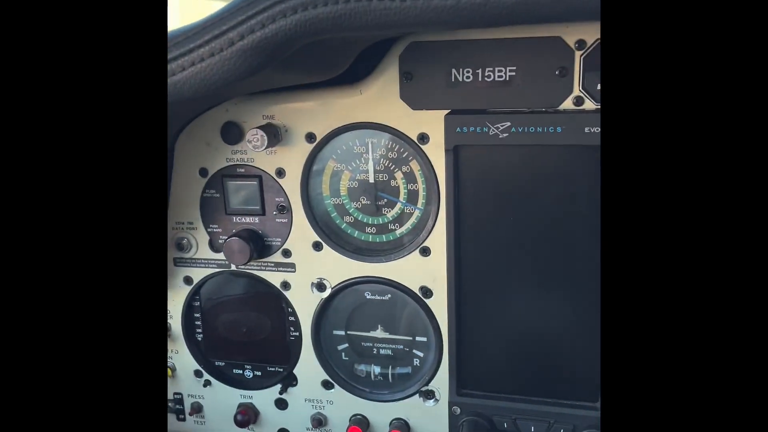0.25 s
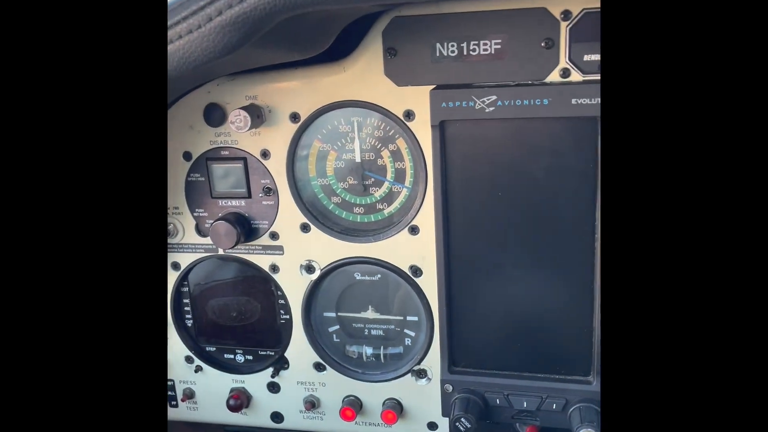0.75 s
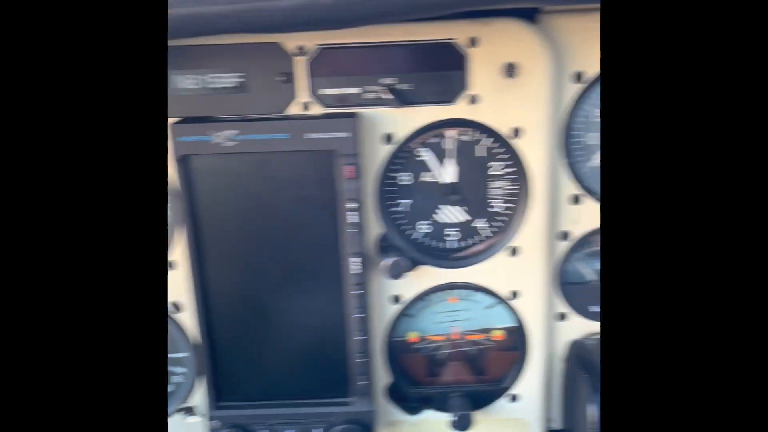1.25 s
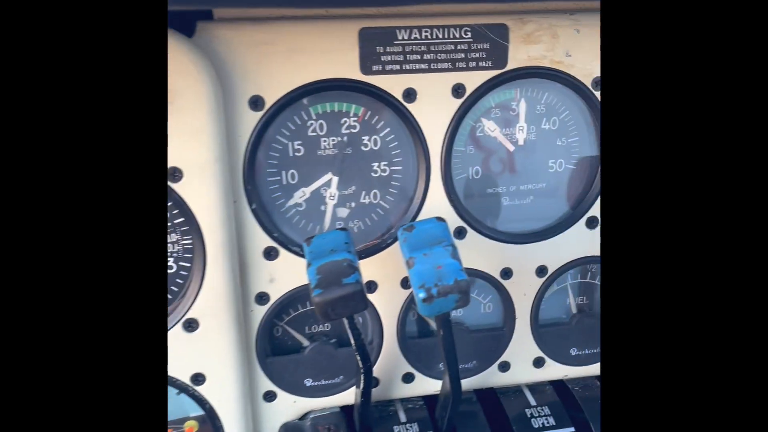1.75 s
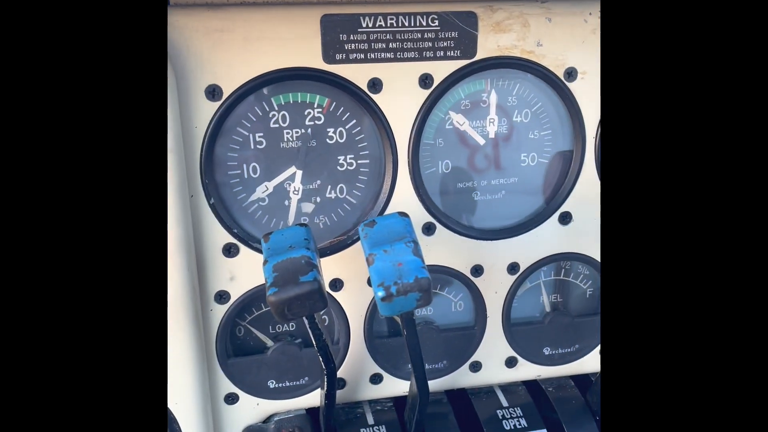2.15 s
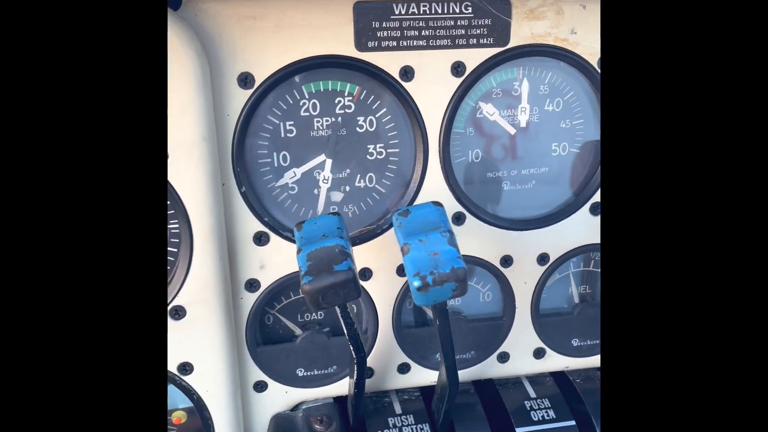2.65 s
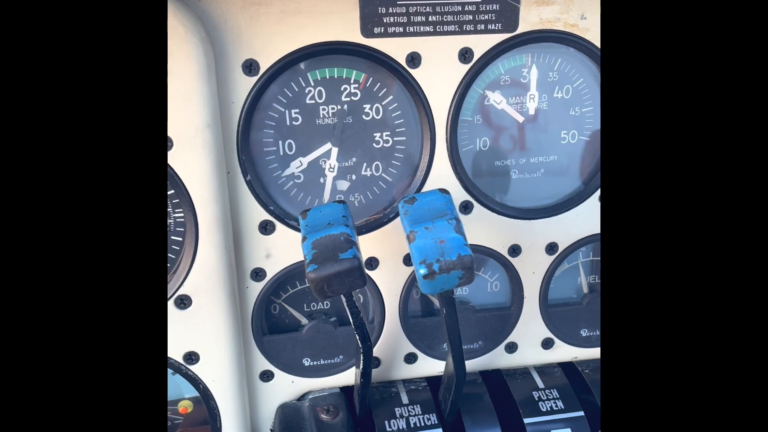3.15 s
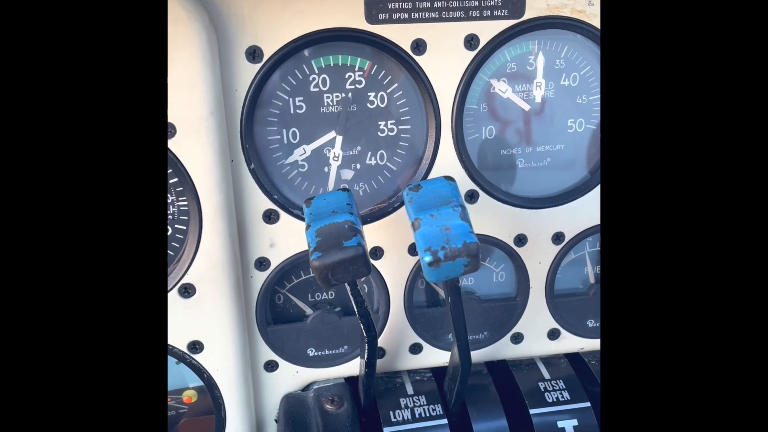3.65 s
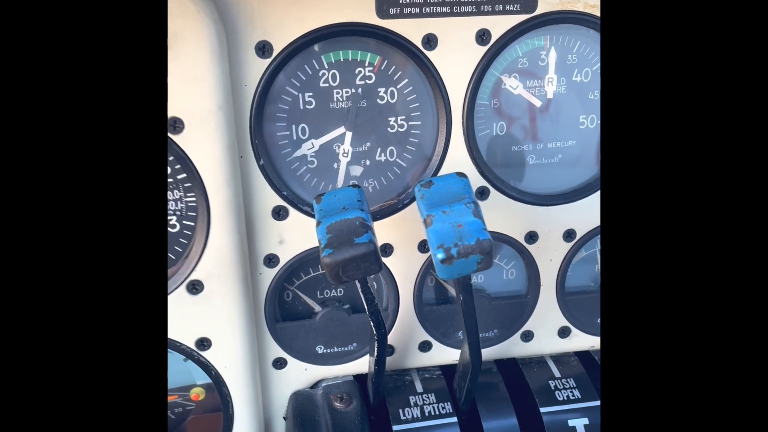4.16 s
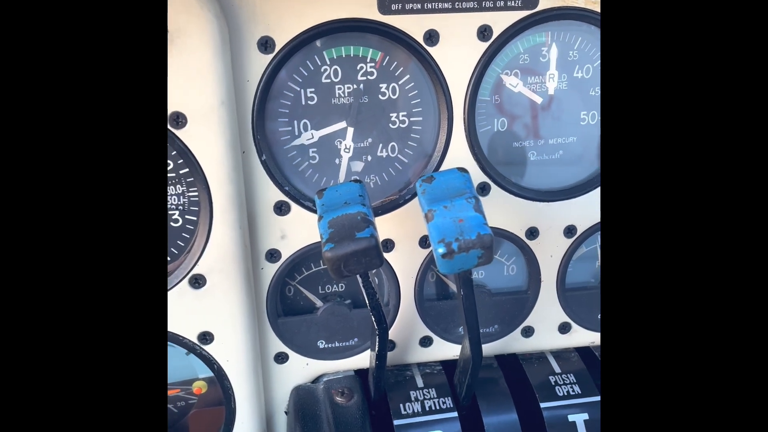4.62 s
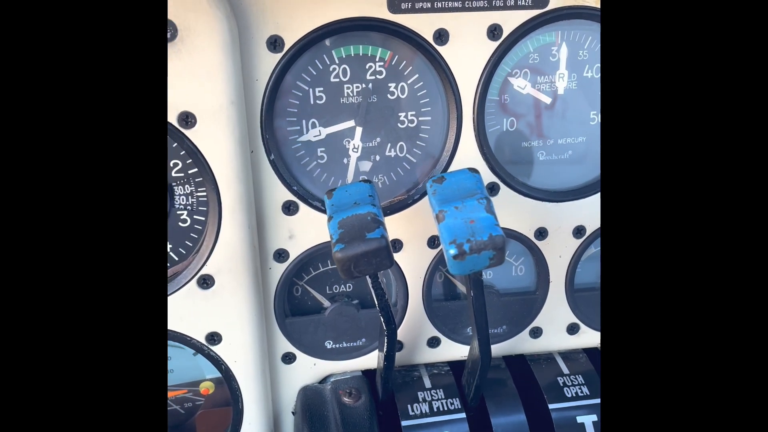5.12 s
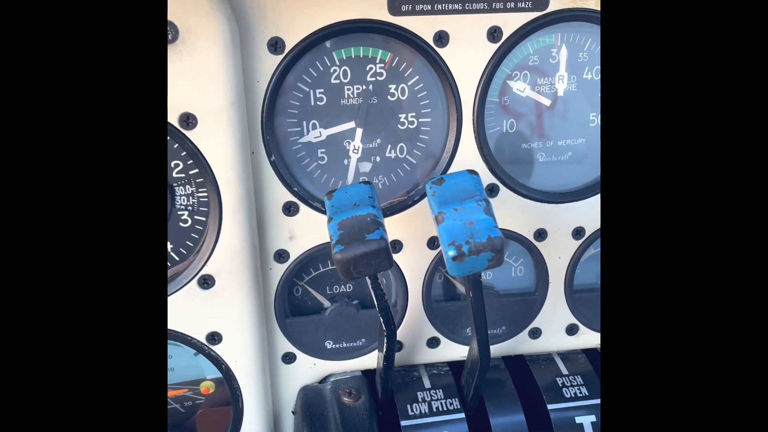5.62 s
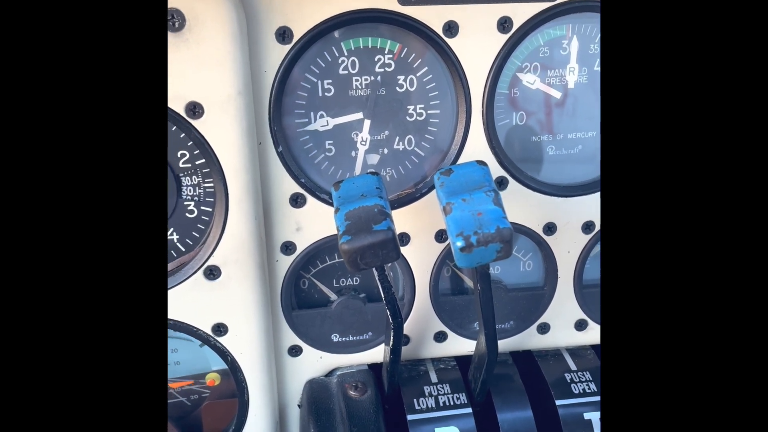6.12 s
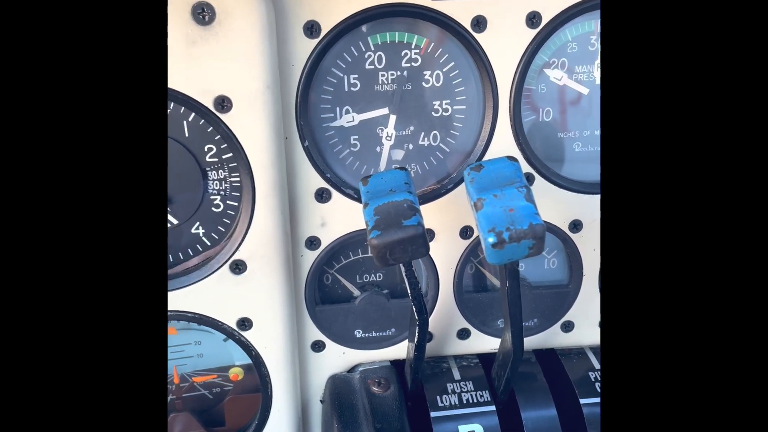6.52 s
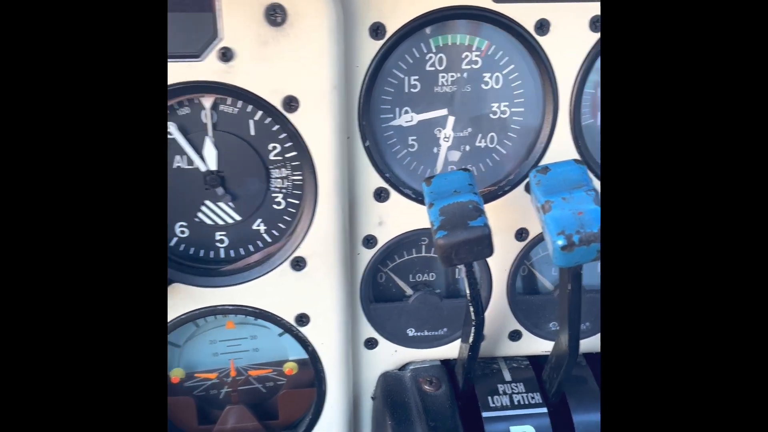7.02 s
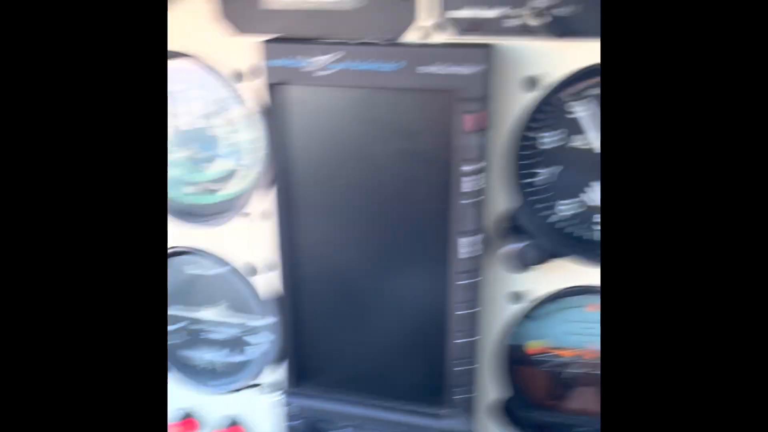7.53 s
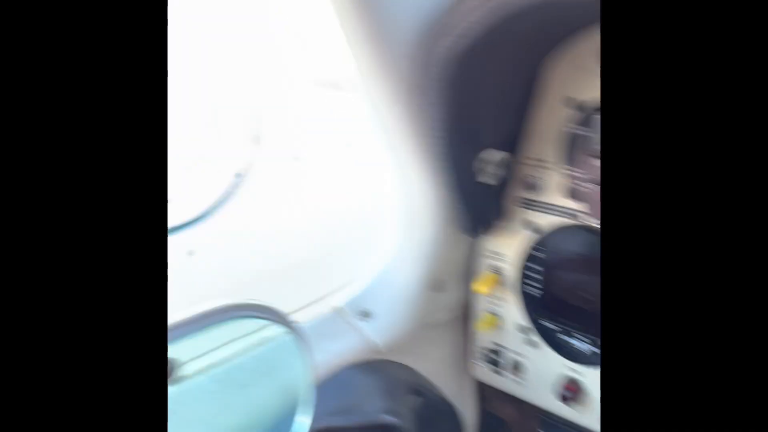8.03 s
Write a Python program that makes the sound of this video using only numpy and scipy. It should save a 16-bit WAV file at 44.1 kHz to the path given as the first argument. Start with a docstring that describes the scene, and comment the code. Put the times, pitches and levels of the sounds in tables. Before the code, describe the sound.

A piston aircraft engine idles lumpily inside a closed cockpit, its deep boom and metallic clatter quickening as throttle rises, ending with louder airy roar.

```python
"""A lumpy engine boom in a closed cockpit, over air roar and gear clatter, rises as the throttle is eased up.
Boom: sines at firing and propeller orders of a geared six-cylinder aircraft engine, weighted by the cabin.
Roar: coloured noise on skin, window and floor, swelling with each firing.
Clatter: noise bursts ringing in the gear case, one per firing, plus valve ticks and hard knocks.
Near the end the hand-held two-port microphone swings to the side window, where the roar is louder."""
import sys
import numpy as np
from scipy import signal
from scipy.fft import rfft, irfft
from scipy.io import wavfile
from scipy.ndimage import uniform_filter1d

SR = 44100
rng = np.random.default_rng(int(sys.argv[2]) if len(sys.argv) > 2 else 0)


def to_wav(s):
    """Save 16-bit WAV."""
    ch = np.atleast_2d(s).T  # columns
    pcm = np.round(np.clip(ch, -1, 1) * 32767)  # PCM
    wavfile.write(sys.argv[1], SR, pcm.astype(np.int16))


N = 365148
SLOTS = 12   # firings per pattern: engine and geared propeller come back into step


def from_db(db):
    """Decibels to amplitude gain."""
    return 10 ** (np.asarray(db) / 20)


def summed_db(a_db, b_db):
    """Level of two unrelated sounds together: powers add."""
    return 10 * np.log10(from_db(2 * a_db) + from_db(2 * b_db))


def rms_one(x):
    """Scale to rms 1."""
    return x / np.sqrt(np.mean(x ** 2) + 1e-20)


def in_time(rows):
    """Columns of a time table, interpolated to one value per sample."""
    time_s, *columns = np.transpose(rows)
    return [np.interp(np.arange(N) / SR, time_s, column) for column in columns]


def at_hz(points, hz, axis=1):
    """One column of a frequency table, interpolated over log frequency."""
    points = np.array(points)
    return np.interp(np.log(np.maximum(hz, 1)), np.log(points[:, 0]), points[:, axis])


def drift(rate_hz):
    """Slow random curve of rms 1: noise through two equal poles at rate_hz."""
    step = 40
    r = np.exp(-2 * np.pi * rate_hz * step / SR)
    noise = rng.standard_normal(N // step + 2002)
    slow = signal.lfilter([1], [1, -2 * r, r * r], noise)[2000:]   # drop the settling
    return np.interp(np.arange(N) / step, np.arange(len(slow)), rms_one(slow - slow.mean()))


# engine and propeller orders: (multiple of pattern rate [1], relative level before cabin [dB])
ORDER_LEVELS = [(12, -12), (18, -20), (24, -19), (30, -29), (36, -28.5), (10, -20), (13, -25), (14, -32),
                (15, -31), (16, -27), (17, -33), (19, -30), (20, -30), (21, -34), (22, -31), (23, -38),
                (25, -31), (26, -33), (27, -38), (28, -37), (29, -34), (31, -35), (35, -44), (37, -46),
                (42, -41), (48, -39), (60, -39), (66, -50), (72, -49), (78, -57), (84, -44), (96, -47.5),
                (108, -49), (120, -48.5), (132, -53)]
# cabin response to low tones: (frequency [Hz], gain [dB], phase [turns])
CABIN = [(20, -37, 1.44), (32, -27, 1.42), (40, -12, 1.71), (46, -5, 2.11), (51, 5, 2.04), (56, 12, 2.14),
         (61, 9, 2.3), (66, 9, 2.46), (71, 4, 2.68), (77, -1, 3.4), (84, 4, 3.72), (92, 6, 4.23),
         (103, 5, 4.8), (118, 5, 4.81), (140, -3, 5.93), (170, 0, 7.01), (230, 8, 8.09), (300, 12, 9.17),
         (460, 11, 10.25)]
# crank speed wobble: phase [turns] at 0 to 3 times the pattern rate
CRANK_WOBBLE = (0, .004, .638, -.043)
# orders that stand out or sink at a slow, lumpy idle: {order [1]: added level [dB]}
LUMPY_ORDERS = {13: 5, 15: -8, 16: 4, 17: 7, 18: -9, 19: 9, 21: 4, 23: 8, 30: -4, 35: 5, 37: 14}
LUMPY_BELOW_PER_S, LUMPY_FADE_PER_S = 37, 3   # firing rate of onset; further drop to full effect
PULSE_LEAD_TURNS = .103   # exhaust pulse ahead of gear slap, in pattern turns
SMEAR_TURNS = .082   # times overtone number squared


def boom(firings, per_s):
    """One sine per order: multiples of six are overtones of a pulse smeared in time by pipes and cabin;
    the orders around them are phased as its vibrato from the crank's uneven speed."""
    step = 20   # computed at every twentieth sample
    turns, rate_hz = firings[::step] / SLOTS, per_s[::step] / SLOTS
    lumpy = np.clip((LUMPY_BELOW_PER_S - per_s[::step]) / LUMPY_FADE_PER_S, 0, 1)
    out = 0
    for order, order_db in ORDER_LEVELS:
        off = (order + 2) % 6 - 2   # steps from the multiple of six, -2 to 3
        overtone = (order - off) / 6
        phase = SMEAR_TURNS * overtone ** 2
        phase = phase + np.sign(off) * CRANK_WOBBLE[abs(off)] + .684 * (off < 0)
        phase = phase + PULSE_LEAD_TURNS * order + at_hz(CABIN, order * rate_hz, axis=2)
        if order > 40:   # high overtones flicker, and sharpen with throttle
            waver_db = 3 * drift(2.5)[::step] - 1
            load_db = 4.0 * (rate_hz - 3.7)
        else:
            waver_db = (1.5 if off else .5) * drift(.52)[::step]
            load_db = 0
        lump_db = lumpy * LUMPY_ORDERS.get(order, 0)
        level_db = order_db + at_hz(CABIN, order * rate_hz) + waver_db + load_db + lump_db
        out = out + np.sqrt(2) * from_db(level_db) * np.sin(2 * np.pi * (order * turns + phase))
    return signal.resample_poly(out, step, 1)[:N]


def coloured(spectrum, panels=()):
    """Two unrelated noises of one colour, joint rms 1: the shared and the scattered part at the ports."""
    hz = np.fft.rfftfreq(N, 1 / SR)
    level_db = at_hz(spectrum, hz)
    for centre_hz, width_hz, top_db in panels:
        level_db = level_db + top_db / (1 + (2 * (hz - centre_hz) / width_hz) ** 2)
    return rms_one(irfft(rfft(rng.standard_normal((2, N))) * from_db(level_db), N))


# roar colour on the skin: (frequency [Hz], relative density [dB per Hz])
SKIN_COLOUR = [(30, -10), (55, 1), (100, 11), (160, -8), (290, -2.5), (420, -6), (520, -9.5), (760, -8.5),
               (1000, -16), (1900, -20.5), (3000, -21.5), (5000, -26.5), (9500, -46), (13000, -36.5),
               (15600, -64)]
# roar colour through the side window: (frequency [Hz], relative density [dB per Hz])
WINDOW_COLOUR = [(60, 12), (160, 0), (380, -2), (500, -0.5), (720, 1.5), (1100, -2), (1600, -5),
                 (1810, -11), (2500, -14.5), (3300, -20.5), (5400, -20.5), (9500, -26), (15000, -30.5)]
# rumble colour through the floor: (frequency [Hz], relative density [dB per Hz])
FLOOR_COLOUR = [(20, -7), (40, 3), (100, 6), (150, 0), (210, -1), (330, -5), (600, -43)]
# panels the roar sets humming: (frequency [Hz], width [Hz], level above the roar [dB])
PANEL_HUMS = [(228, 30, 4), (276, 95, 2), (435, 35, 3.5), (705, 80, 3), (806, 65, 4), (1170, 60, 3.5),
              (1470, 40, 5), (2270, 45, 4.5)]


def roar(firings, skin_db, window_db, floor_db):
    """Exhaust and propeller wash: noise that swells with each firing, on skin, window and floor."""
    def beat(lag_turns):
        return np.cos(2 * np.pi * (firings - lag_turns))

    skin_db = skin_db + .8 * drift(5.0) + .6 * beat(.15)
    skin = from_db(skin_db) * coloured(SKIN_COLOUR, PANEL_HUMS)

    # each exhaust puff draws its own strength; it switches between puffs
    puff_strength = rng.uniform(.5, 1.5, int(firings[-1]) + 3)[np.floor(firings + 1.28).astype(int)]
    puff_db = 4.5 * puff_strength * (.5 + .5 * beat(.22)) ** 2 - 1.8
    window_db = window_db + .7 * drift(14) + puff_db
    window = from_db(window_db) * coloured(WINDOW_COLOUR, PANEL_HUMS[:7])
    window = window * from_db([[1.5], [-9]])   # from one side: little of it scattered

    floor_db = floor_db + 2.9 * drift(16) + 3.9 * beat(.7)
    floor = from_db(floor_db) * coloured(FLOOR_COLOUR)
    return skin + window + floor


# gear slap by slot: (relative level in first lope shape [dB], in second shape [dB], brightness [dB])
SLAP_SLOTS = [(-25, -22, -14), (-79, -28, -22), (-21.5, -23.5, -12), (-39, -18.5, -26), (-30.5, -25, -13),
              (-22, -30, -21), (-41.5, -65, -18), (-23.5, -28, -15), (-22, -22.5, -14), (-20.5, -37, -29),
              (-24.5, -24, -12), (-22.5, -29.5, -25)]
FIRST_SHAPE_FROM_S, FIRST_SHAPE_TO_S = .45, 5.95
USUAL_BRIGHTNESS_DB = -13.5   # the case rings as listed


def gear_slaps(firings, level_db):
    """Gear teeth slap once per firing, with jittered time and level: (sample, level, brightness)."""
    at = np.flatnonzero(np.diff(np.floor(firings)) > 0)
    slot = np.floor(firings[at + 1]).astype(int) % SLOTS
    first = (at > FIRST_SHAPE_FROM_S * SR) & (at < FIRST_SHAPE_TO_S * SR)
    chance = rng.standard_normal((len(at), 2))
    slots = np.array(SLAP_SLOTS)
    strength_db = slots[slot, np.where(first, 0, 1)] + level_db[at] + 1.8 * chance[:, 0]
    bright_db = slots[slot, 2] - USUAL_BRIGHTNESS_DB
    shift_s = .0012 * chance[:, 1] - .0015
    at = np.clip(at + (shift_s * SR).astype(int), 0, N - 1)
    return at, strength_db, bright_db


def valve_ticks(level_db, ticks_per_s=35, tick_db=-31):
    """Valve gear ticks at random moments: (sample, level, brightness)."""
    at = np.flatnonzero(rng.random(N) < ticks_per_s / SR)
    bright_db = 4 * rng.standard_normal(len(at))
    strength_db = tick_db + level_db[at] + 3 * rng.standard_normal(len(at))
    return at, strength_db, bright_db


# hardest gear knocks: (time [s], relative level [dB], brightness [dB], strongest ring [Hz])
HARD_KNOCKS = [(0.1303, -12, -17, 2970), (0.175, -14, -26, 2960), (0.243, -7.5, -13, 3000),
               (0.547, -16, -6, 2800), (0.7485, -13, -14, 2330), (0.7866, -15.5, -8, 2230),
               (0.823, -12.5, -17, 2280), (0.8595, -12.5, -17, 2310), (0.9314, -12.5, -15, 2600),
               (1.001, -17.5, -11, 2780), (1.113, -16.5, -16, 2220), (1.1843, -14, -22, 2360),
               (1.2226, -16, -17, 2460), (1.257, -14, -21, 2860), (1.356, -13.5, -26, 2760),
               (1.426, -17, -32, 3020), (1.6017, -15.5, -21, 4220), (1.6351, -14.5, -10, 3120),
               (1.67, -14.5, -21, 2890), (1.764, -12.5, -23, 3680), (2.055, -14.5, -12, 4180),
               (2.148, -13.5, -13, 3890), (2.2104, -17.5, -8, 4330), (2.3719, -19, -14, 3180),
               (2.4347, -18, -9.5, 4100), (2.526, -16.5, -16, 3550), (2.8, -15, -15, 3070),
               (2.888, -21, -6, 2900), (3.251, -11.5, -15, 3720), (3.5134, -13, -16, 2760),
               (3.6026, -16.5, -21, 3000), (3.84, -18, -8, 3850), (3.866, -16.5, -21, 4110),
               (3.9533, -12, -30, 3880), (4.1748, -20.5, -13, 3120), (4.4428, -18, -28, 2820),
               (4.6433, -16, -15, 3200), (5.097, -12, -27, 4060), (5.377, -14.5, -23, 3200),
               (5.4445, -18.5, -12, 2660), (5.491, -20, -11, 2500), (5.6097, -21, -22, 4110),
               (5.654, -15, -25, 3190), (5.7214, -19, -18, 2960), (5.9997, -19, -9, 2900),
               (6.0467, -15.5, -15, 3040), (6.341, -9.5, -24, 2930), (6.543, -16, -27, 5270),
               (7.0758, -14, -28, 2910), (7.3355, -13.5, -21, 2890), (7.3806, -17, -20, 3150),
               (7.5967, -13.5, -9.5, 3820), (7.64, -18, -6, 4070), (7.855, -16, -14, 4100),
               (7.897, -16, -2.5, 3090), (8.0019, -14, -13, 3080), (8.024, -11.5, -9, 3860),
               (8.109, -7.5, -19, 2120)]


def hard_knocks(at, strength_db, bright_db, colour_db):
    """Each hard knock takes the place of the nearest blow and favours resonances near its ring (in place)."""
    case_hz = np.array(CASE_RINGS)[:, 0]
    for time_s, level_db, top_db, ring_hz in HARD_KNOCKS:
        k = np.argmin(abs(at - time_s * SR))
        at[k], strength_db[k], bright_db[k] = round(time_s * SR), level_db, top_db - USUAL_BRIGHTNESS_DB
        octaves_off = np.log2(case_hz / ring_hz)
        colour_db[k] = .5 * colour_db[k] + 6.0 / (1 + (octaves_off / .12) ** 2)


# gear case and panel resonances: (frequency [Hz], width [Hz], relative level [dB])
CASE_RINGS = [(1513, 34, -3), (2013, 34, 0.5), (2268, 18, 4.5), (2620, 184, -1), (2930, 54, 5.5),
              (3120, 130, 2), (3607, 47, 4.5), (3946, 96, 4.5), (4330, 42, 2.5), (4660, 17, 2.5),
              (5300, 650, -6), (6000, 56, -2.5), (8120, 128, 2.5), (9980, 480, -6.5), (11900, 2600, -48),
              (16900, 2300, -16)]
DETUNE = .023   # share by which each blow rings each resonance sharp or flat


def ring_case(at, strength_db, bright_db, colour_db, rise_s=.0015, snap_s=.0025, tail_s=.025, tail_db=-11):
    """Each blow is a short noise burst: a snap as teeth meet, then a rattling tail, through two-pole resonators."""
    white, out = rng.standard_normal((2, 2, N)), 0
    rise, snap = np.exp(-1 / (rise_s * SR)), np.exp(-1 / (snap_s * SR))
    sharp = rng.random(colour_db.shape) < .5
    for k, up in np.ndindex(len(CASE_RINGS), 2):
        hz, width_hz, mode_db = CASE_RINGS[k]
        hz = hz * (1 + DETUNE * (2 * up - 1))
        mine = sharp[:, k] == up
        blow_db = strength_db + colour_db[:, k] + bright_db * (hz > 7000)
        blows = np.full(N, 1e-12)
        blows[at[mine]] = from_db(blow_db)[mine]
        fall = np.exp(-(hz / 3000) ** .5 / (tail_s * SR))   # treble dies first
        rattle = signal.lfilter([1], [1, -snap], blows)
        rattle = rattle + signal.lfilter([from_db(tail_db)], [1, -fall], blows)
        rattle = signal.lfilter([1 - rise], [1, -rise], rattle)
        r = np.exp(-np.pi * width_hz / SR)
        zeros = [(1 - r * r) / 2, 0, (r * r - 1) / 2]
        poles = [1, -2 * r * np.cos(2 * np.pi * hz / SR), r * r]
        out = out + from_db(mode_db) * signal.lfilter(zeros, poles, rattle * white[k % 2])
    return from_db(5.0) * out


def clatter(firings, level_db):
    """Slaps, ticks and knocks ring the case, each blow in its own colour at equal total energy."""
    blows = zip(gear_slaps(firings, level_db), valve_ticks(level_db))
    at, strength_db, bright_db = [np.concatenate(pair) for pair in blows]
    colour_db = 3.96 * rng.standard_normal((len(at), len(CASE_RINGS)))
    hard_knocks(at, strength_db, bright_db, colour_db)
    weight = from_db(2 * np.array(CASE_RINGS)[:, 2])
    mean_power = from_db(2 * colour_db) @ weight / weight.sum()
    colour_db -= 10 * np.log10(mean_power)[:, None]
    return ring_case(at, strength_db, bright_db, colour_db)


# two microphone ports: (frequency [Hz], likeness -1 to 1 [1], left minus right [dB])
PORT_PAIR = [(98, 1, 0), (323, 0.97, 1.5), (680, 0.38, 3.5), (1060, 0.045, 4.5), (1780, 0.49, 0),
             (2620, 0.39, 6), (4020, 0.48, 2.5), (5470, 0.34, 1), (6900, 1, -6), (8660, 0.79, 2),
             (9220, 0.1, 19.5), (9800, .98, -3.5), (11800, 1, 0), (13700, 1, -0.5), (16200, 1, 2)]
PORT_LAG_FROM_HZ, PORT_LAG_S = 5100, .000166   # above this the right port hears later


def ports(shared, scattered):
    """Mix both parts to the likeness, balance and treble lag of the two ports."""
    hz = np.fft.rfftfreq(N, 1 / SR)
    alike = np.clip(at_hz(PORT_PAIR, hz), -1, 1)
    mid = rfft(shared) * np.sqrt((1 + alike) / 2)
    side = rfft(scattered) * np.sqrt((1 - alike) / 2)
    lag_phase = np.exp(1j * np.pi * PORT_LAG_S * np.maximum(hz - PORT_LAG_FROM_HZ, 0))
    lean = from_db(at_hz(PORT_PAIR, hz, axis=2) / 2) * lag_phase   # half to each port
    return irfft([(mid + side) * lean, (mid - side) / lean], N)


# engine speed: (time [s], firing rate [1/s])
ENGINE_SPEED = [(0.0, 26.31), (0.3, 26.2), (0.6, 25.33), (0.85, 26.65), (1.1, 28.38), (1.4, 28.35),
                (1.65, 30.54), (1.9, 31.09), (2.3, 31.78), (2.7, 32.85), (3.1, 33.47), (3.5, 34.11),
                (3.85, 34.0), (4.2, 37.01), (4.6, 39.79), (4.95, 42.98), (5.3, 42.99), (5.7, 43.1),
                (6.1, 44.01), (6.6, 44.65), (7.2, 45.83), (7.8, 46.63), (8.28, 47.62)]
# window roar as the microphone turns away and back: (time [s], level [dB])
WINDOW_LEVEL = [(0, -30), (1, -26.5), (1.6, -31), (2.2, -37), (3.6, -60), (4.3, -32.5), (5, -38.5),
                (6, -29), (7, -31.5), (7.4, -24.5), (7.7, -18.5), (7.95, -16), (8.28, -11)]
# floor rumble: (time [s], level [dB])
FLOOR_LEVEL = [(0, -24), (1.0, -22.5), (2.3, -30.5), (3.5, -28.5), (4.5, -27), (6, -30), (7, -25),
               (8.28, -26)]
FIRST_FIRING = .40   # firings to go until the first slot
USUAL_PER_S = 38   # firing rate at which the base levels below hold
BOOM_DB, BOOM_DB_PER_FIRING = -.24, .02   # base; change per added firing/s
SKIN_DB, SKIN_DB_PER_FIRING = -22.5, .2339
CLATTER_DB, CLATTER_DB_PER_FIRING = 1.1, -.01
CLATTER_LEAK_DB, FLOOR_LEAK_DB = 22, -6.5   # relative to window level, added as power


def scene():
    """Boom almost alike at both ports; roar and clatter spread between them."""
    per_s, = in_time(ENGINE_SPEED)
    window_db, = in_time(WINDOW_LEVEL)
    floor_db, = in_time(FLOOR_LEVEL)
    firings = np.cumsum(per_s) / SR - FIRST_FIRING
    faster = per_s - USUAL_PER_S
    low = from_db(BOOM_DB + BOOM_DB_PER_FIRING * faster) * boom(firings, per_s)
    skin_db = SKIN_DB + SKIN_DB_PER_FIRING * faster
    air = roar(firings, skin_db, window_db, summed_db(floor_db, window_db + FLOOR_LEAK_DB))
    clatter_db = CLATTER_DB + CLATTER_DB_PER_FIRING * faster
    gear = clatter(firings, summed_db(clatter_db, window_db + CLATTER_LEAK_DB))
    return low * from_db([[.05], [-.05]]) + ports(*(gear + air))


LIMIT_DB, RELEASE_DB_PER_S, ATTACK_S, CUTOFF_HZ = -.5, 90, .002, 15720


def record(dry):
    """The recorder's look-ahead gain control holds peaks down; an elliptic low-pass cuts the top."""
    over_db = np.maximum(20 * np.log10(abs(dry).max(axis=0) + 1e-9) - LIMIT_DB, 0)
    ramp_db = RELEASE_DB_PER_S * np.arange(N) / SR
    held_db = np.maximum.accumulate(over_db + ramp_db) - ramp_db   # falls at the release rate
    ahead = round(ATTACK_S * SR)
    early_db = np.r_[held_db[ahead:], np.full(ahead, held_db[-1])]
    cut_db = uniform_filter1d(early_db, 2 * ahead + 1)
    low_pass = signal.ellip(10, .5, 70, CUTOFF_HZ, fs=SR, output="sos")
    return signal.sosfilt(low_pass, dry * from_db(-cut_db))


dry = scene()
out = record(dry)
to_wav(out)
```